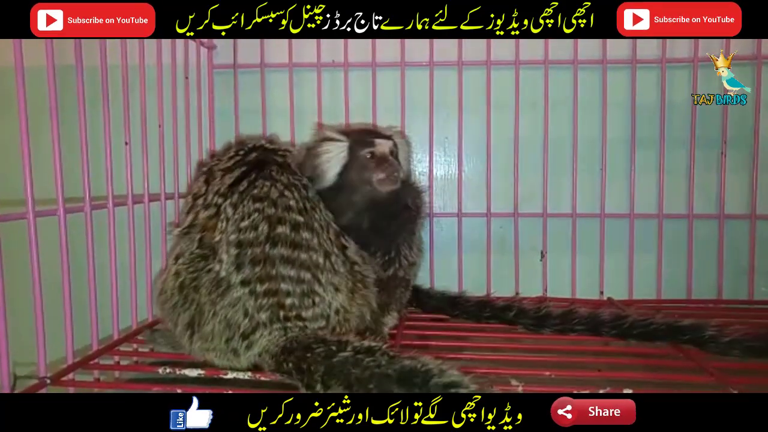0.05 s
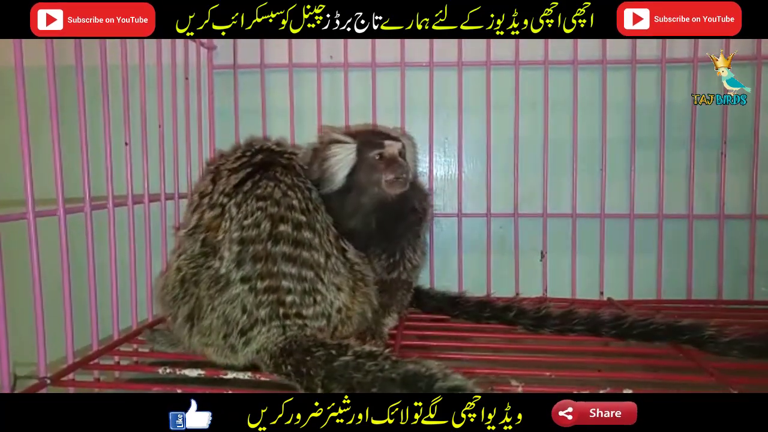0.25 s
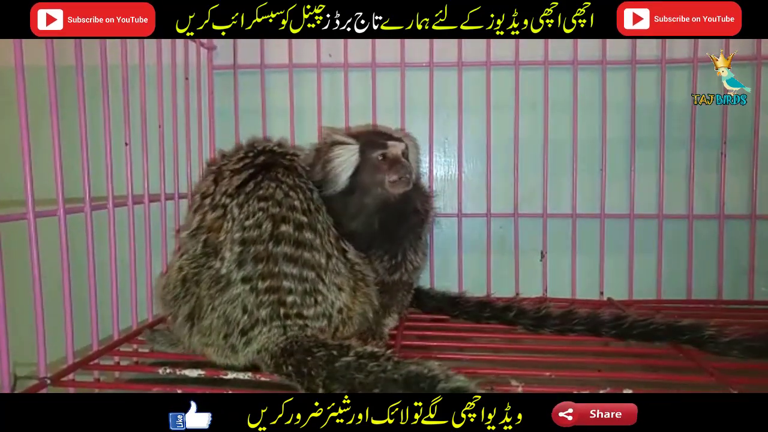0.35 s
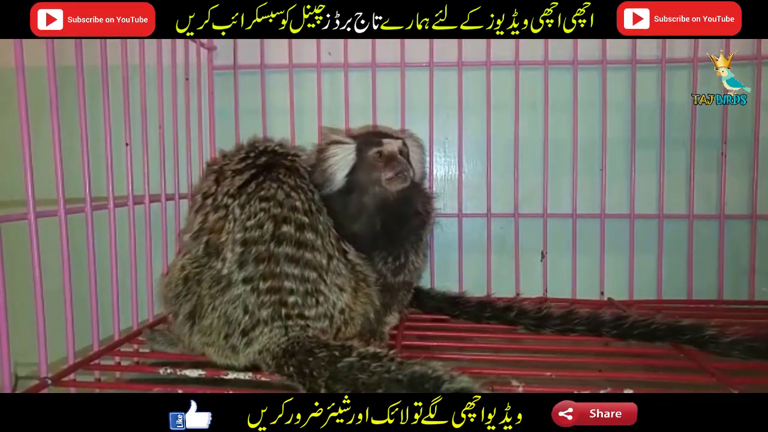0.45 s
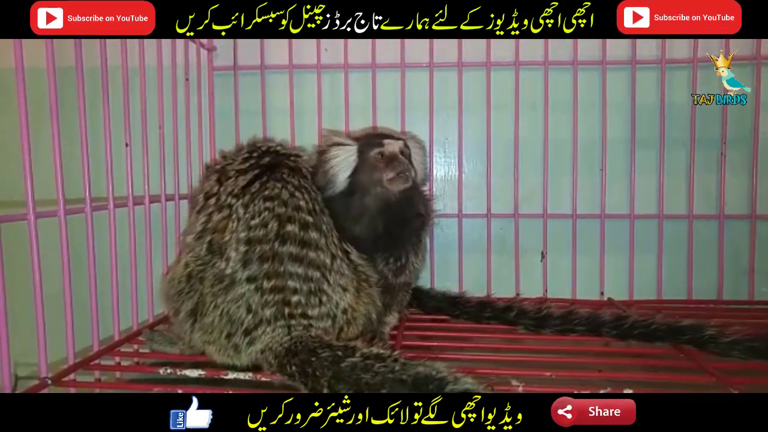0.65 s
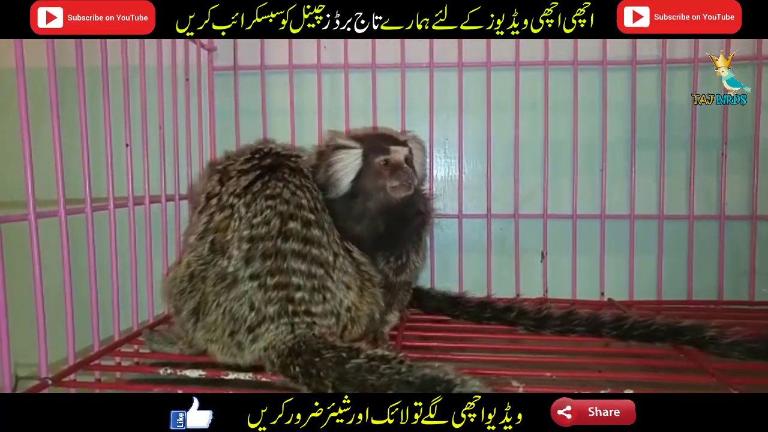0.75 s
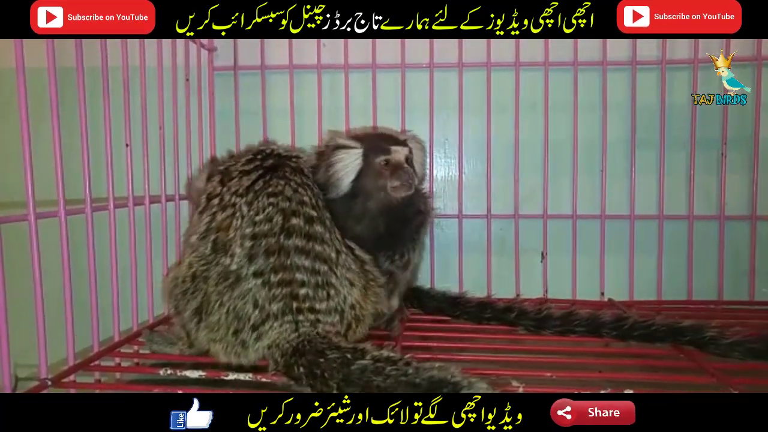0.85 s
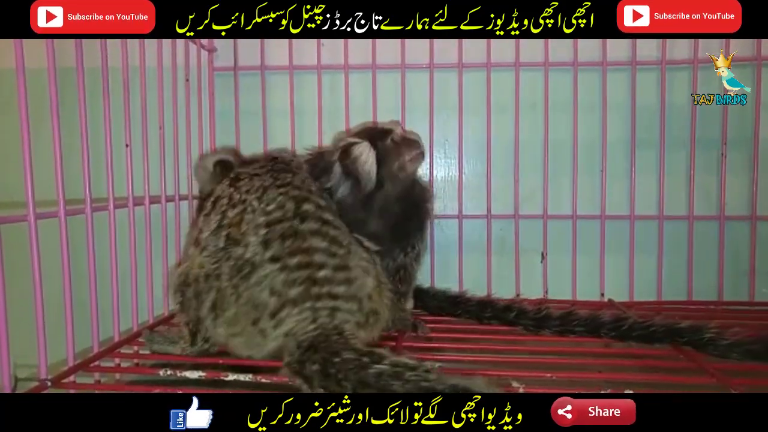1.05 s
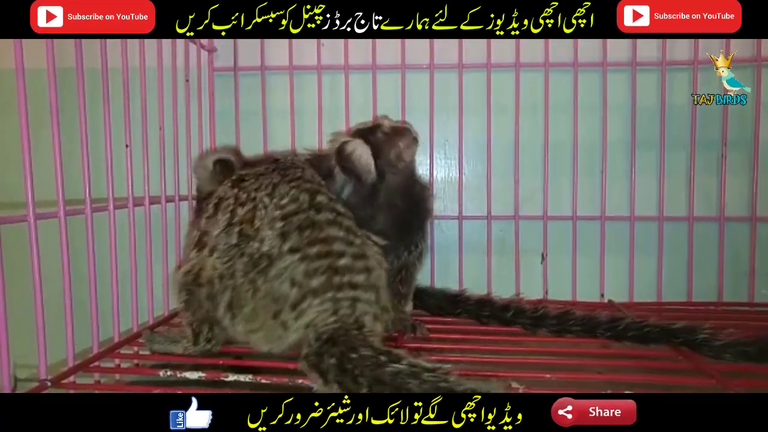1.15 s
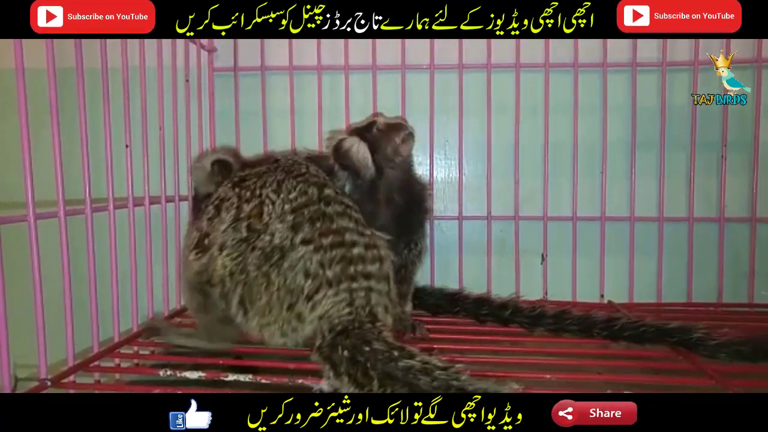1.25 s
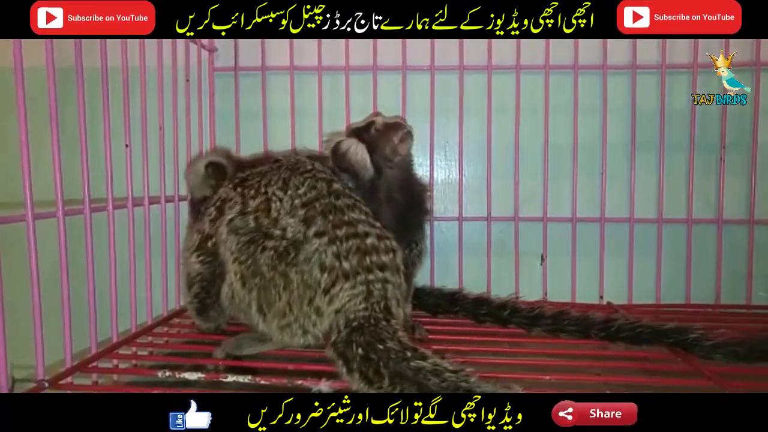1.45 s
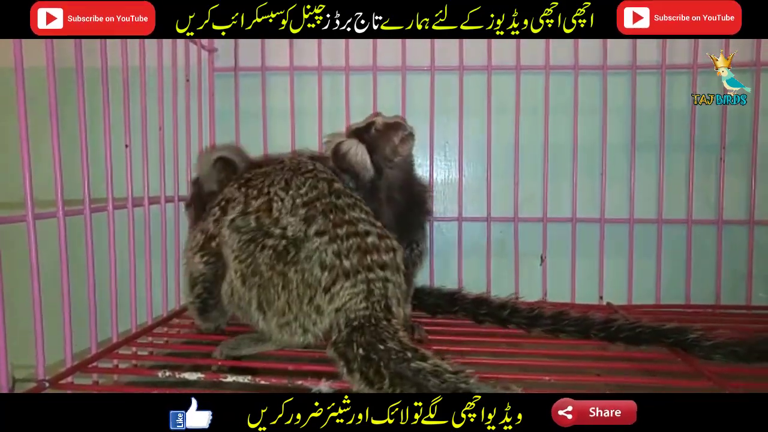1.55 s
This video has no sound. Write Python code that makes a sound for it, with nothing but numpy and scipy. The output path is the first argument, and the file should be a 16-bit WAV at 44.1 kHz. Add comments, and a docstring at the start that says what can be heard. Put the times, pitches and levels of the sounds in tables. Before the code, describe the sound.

Marmosets call close by in a hard-walled room: thin high squeaks, a light knock and rustle, a loud pure rising whistle, then a trill and overlapping rasping screeches over faint hum and shuffling.

```python
"""Marmosets calling in a wire cage

After thin whistles, a brief rustle and a knock, one gives a loud, pure rising whistle close by. Others answer
with trills and rasping, gliding screeches that ring in a hard-walled room. A bird peeps far off over mains hum,
fan tones, low room noise and shuffling. Voices are harmonics on moving pitches, the knocks are damped modes,
and the rustle, shuffling and room noise are coloured noise.
"""
import sys
import numpy as np
from scipy import signal
from scipy.fft import rfft, irfft
from scipy.io import wavfile

SR = 44100
rng = np.random.default_rng(int(sys.argv[2]) if len(sys.argv) > 2 else 0)


def to_wav(s):
    """Save 16-bit WAV."""
    ch = np.atleast_2d(s).T  # columns
    pcm = np.round(np.clip(ch, -1, 1) * 32767)  # PCM
    wavfile.write(sys.argv[1], SR, pcm.astype(np.int16))


N = 70560
TIME = np.arange(N) / SR


def from_db(db):
    """Decibels to gain."""
    return 10 ** (np.asarray(db) / 20)


def rms_one(x):
    """Scale to unit rms."""
    return x / np.sqrt(np.mean(x ** 2) + 1e-20)


def in_time(rows):
    """Columns of a curve, interpolated over time at every sample."""
    s, *columns = np.transpose(rows)
    return [np.interp(TIME, s, c) for c in columns]


def at_hz(points, hz):
    """Read a table on a log-frequency axis."""
    f, v = np.transpose(points)
    return np.interp(np.log(np.maximum(hz, 1)), np.log(f), v)


def drift(rate_hz):
    """Smooth random motion of rms 1, made by low-passing noise at rate_hz."""
    sos = signal.butter(2, min(rate_hz, SR / 4), fs=SR, output="sos")
    settled = signal.sosfilt(sos, rng.standard_normal(2 * N))[N:]
    return rms_one(settled)


def gate(start, length):
    """Switch a sound on and off with soft edges."""
    edge_s = 0.0017
    from_edge = np.minimum(TIME - start, start + length - TIME)
    return np.sin(np.pi / 2 * np.clip(from_edge / edge_s, 0, 1)) ** 2


def voice(hz, harmonics_db):
    """A tone on a moving pitch with its harmonics; a 0 dB harmonic has unit rms."""
    phase = 2 * np.pi * (np.cumsum(hz) / SR + rng.random())
    out = 0
    for k, db in enumerate(harmonics_db, 1):
        below_nyquist = k * hz < SR / 2
        out = out + from_db(db) * np.sin(k * phase) * below_nyquist
    return np.sqrt(2) * out


def noise(spectrum):
    """Coloured stereo noise of unit rms, most alike on both sides in the bass."""
    # left-right likeness: frequency_hz, likeness (0-1)
    likeness = [(60, 0.85), (160, 0.88), (350, 0.88), (700, 0.35), (2000, 0.1), (10000, 0.02)]
    hz = np.arange(N // 2 + 1) * SR / N
    alike = np.clip(at_hz(likeness, hz), 0, 1)
    mid, side = rfft(rng.standard_normal((2, N)))
    stereo = np.sqrt(1 + alike) * mid + np.sqrt(1 - alike) * side * [[1], [-1]]
    return rms_one(irfft(from_db(at_hz(spectrum, hz)) * stereo, N))


def pan(x, db):
    """Place a sound by the level difference between sides; positive is left."""
    return x * from_db(np.array([[1], [-1]]) * db / 2)


def delay(x, seconds):
    """The same sound, later, by turning its phase in proportion to frequency."""
    turn = np.exp(-1j * np.pi * np.arange(N + 1) * SR / N * seconds)
    return irfft(rfft(x, 2 * N) * turn, 2 * N)[:N]


def at_ports(x, lag_ms):
    """The left microphone port hears the sound a little later than the right."""
    return np.array([delay(x, lag_ms / 1000), x])


def in_room(x, room_db):
    """Direct sound plus a dense noise tail, different on each side, each band dying at its own rate."""
    # reverberation time: frequency_hz, t60_s
    room_t60 = [(500, 0.14), (1000, 0.56), (4000, 0.37), (8000, 0.41), (15000, 0.26)]
    first_echo_s = 0.0038
    t = TIME[:N // 2]
    edges = np.geomspace(400, 20000, 8)
    hz = np.arange(N // 2 + 1) * SR / N
    white = rfft(rng.standard_normal((2, N)))
    tail = 0
    for low, high in zip(edges, edges[1:]):
        band = irfft(white * (hz >= low) * (hz < high), N)[:, :len(t)]
        decay = np.exp(-np.log(1000) * t / at_hz(room_t60, np.sqrt(low * high)))
        tail = tail + band * decay * (t > first_echo_s)
    response = rms_one(tail) / np.sqrt(len(t))
    wet = signal.fftconvolve(x * np.ones((2, 1)), response, axes=1)[:, :N]
    return (x + from_db(room_db) * wet) / np.sqrt(1 + from_db(room_db) ** 2)


def hum():
    """Mains hum and fan tones, each wavering slightly in pitch and level."""
    # steady tones: pitch_hz, level_db
    tones = [(99.7, -57.5), (79, -68), (49, -70.5), (373.5, -71.5)]
    out = 0
    for hz, db in tones:
        out = out + voice(hz + .5 * drift(4.4), [db]) * from_db(0.35 * drift(2.38))
    return out


def room_noise():
    """Soft coloured noise whose level moves slowly."""
    # relative spectrum: frequency_hz, density_db (per Hz)
    spectrum = [(25, -22.5), (45, 0.5), (100, 4), (170, -7.5), (350, -3.5), (520, -12), (750, -5.5),
                (1500, -15.5), (3200, -17), (8000, -6), (10500, -18), (13000, -29.5)]
    # level curve: time_s, level_db
    level = [(0, -56), (.55, -52.5), (.9, -58), (1.2, -65.5), (1.38, -71.5), (1.6, -61.5)]
    db, = in_time(level)
    return from_db(db) * noise(spectrum)


def shuffling():
    """The animals shuffle on the cage floor: low coloured noise that swells and fades."""
    # relative spectrum: frequency_hz, density_db (per Hz)
    spectrum = [(25, -14.5), (60, 5.5), (130, -6), (280, -1.5), (500, -10.5), (800, -9.5), (1500, -17.5),
                (4000, -23), (9000, -58.5)]
    # level curve: time_s, level_db
    level = [(0, -79), (.68, -69), (.77, -53.5), (.95, -59.5), (1.07, -56.5), (1.2, -58.5), (1.55, -62.5),
             (1.6, -54)]
    db, = in_time(level)
    return from_db(db) * noise(spectrum)


def peeps():
    """A distant bird: short nasal notes, clear or hoarse, that scoop up to pitch, more room than direct."""
    # notes: start_s, length_s, pitch_hz, level_db, overtones_db, roughness (rms share of pitch)
    notes = [(.35, .05, 1400, -68, -20, .03), (.425, .05, 1350, -64, -20, .05),
             (0.46, 0.1, 2164, -66, -10, .006), (.73, .08, 2380, -64, -20, .035),
             (0.964, .12, 1860, -71, -29, .006), (1.13, 0.06, 1034, -54.5, -3.5, .002)]
    overtone_shape_db = [-1, .5, -8, -6]  # harmonics 2 to 5, added to overtones_db
    scoop_share, scoop_s = 0.045, 0.0077  # share of pitch a note starts low; time constant of the rise
    out = 0
    for s, length, hz, db, overtones_db, rough in notes:
        scoop = scoop_share * np.exp(-np.maximum(TIME - s, 0) / scoop_s)
        pitch = hz * (1 - scoop + rough * drift(190))
        harmonics_db = [0] + [overtones_db + d for d in overtone_shape_db]
        out = out + voice(pitch, harmonics_db) * from_db(db) * gate(s, length)
    return in_room(out, room_db=1)


def rustle():
    """A short, bright brush of noise, made grainy by fast random level changes."""
    # relative spectrum: frequency_hz, density_db (per Hz)
    spectrum = [(2000, -14), (3200, -26.5), (4300, -4), (6000, -4), (10000, 2.5), (14000, 0), (15500, 3),
                (17000, -14.5)]
    start_s, attack_s, hold_s, fall_db_per_s = 0.1738, 0.018, .014, 556
    t = TIME - start_s
    attack = np.clip(t / attack_s, 0, 1)
    fall = from_db(-fall_db_per_s * np.maximum(t - attack_s - hold_s, 0))
    grain = from_db(-40.5 + 5.1 * drift(400))
    return in_room(pan(noise(spectrum) * attack * fall * grain, db=2.5), room_db=-6)


def knock():
    """Light blows ring the cage's damped modes, alternating in sign."""
    # blows: time_s, level_db
    blows = [(.1775, -39), (.181, -98.5), (1.592, -55)]
    # what the cage rings with: pitch_hz, level_db (added to the blow's), t60_s
    modes = [(740, -7, 0.0342), (1060, -6.5, 0.049), (1308, -4.5, 0.042), (1580, -2.5, 0.011),
             (6900, 1.5, 0.017), (9200, 3, 0.0076), (13300, -8.5, 0.012)]
    out = 0
    for s, db in blows:
        t = np.maximum(TIME - s, 0)
        for k, (hz, mode_db, t60) in enumerate(modes):
            ring = np.sin(2 * np.pi * hz * t) * np.exp(-np.log(1000) * t / t60)
            out = out + (-1) ** k * from_db(db + mode_db) * ring
    return in_room(out, room_db=-10)


def thin_whistles():
    """Faint, short, nearly level notes: a fundamental and a weaker octave on a roughened pitch."""
    # notes: start_s, length_s, pitch_hz, glide_hz_per_s, level_db, octave_db (re fundamental)
    notes = [(0, 0.036, 7340, -500, -50, -9), (0.084, 0.023, 7570, -300, -56.5, -11),
             (0.133, 0.018, 7420, -900, -50, -8)]
    waver = .005  # rms share of pitch
    out = 0
    for s, length, hz, glide, db, octave_db in notes:
        pitch = (hz + glide * (TIME - s)) * (1 + waver * drift(199.7))
        out = out + voice(pitch, [0, octave_db]) * from_db(db) * gate(s, length)
    return in_room(pan(out, db=3.5), room_db=-5.5)


def trills():
    """The pitch swings about thirty times a second; the octave is stronger than the fundamental."""
    # calls: start_s, length_s, pitch_hz, glide_hz_per_s, swing_hz, level_db, octave_db (re fundamental),
    # swell_s, swell_db, fade_db_per_s, room_db
    calls = [(0.399, 0.165, 5020, -1200, 240, -37.5, 1.5, 0.026, 12, -75, -6),
             (1.522, .032, 6075, -0.5, 40, -45.5, 4, 0.0073, 28, -150, -8),
             (1.563, .05, 6170, 3, 45, -46.5, 3.5, 0.006, 12, -190, -5)]
    swing_rate_hz = 29.5
    rough, fray_per_s2 = .002, .22  # rms share of pitch; a long trill frays into a rasp
    out = 0
    for s, length, hz, glide, swing, db, octave_db, swell_s, swell_db, fade, room_db in calls:
        t = np.clip(TIME - s, 0, length)
        centre = hz + glide * t - swing * np.cos(2 * np.pi * swing_rate_hz * t)
        pitch = centre * (1 + (rough + fray_per_s2 * t ** 2) * drift(400))
        level = db - swell_db * np.maximum(1 - t / swell_s, 0) + fade * np.maximum(t - swell_s, 0)
        call = voice(pitch, [0, octave_db]) * from_db(level) * gate(s, length)
        out = out + in_room(pan(at_ports(call, lag_ms=0.2655), db=-4.5), room_db)
    return out


def screeches():
    """Gliding whistles broken into a rasp by uneven pitch swings, louder at the bottom of each swing."""
    # calls: octave_db (re fundamental), pan_db, curve of (time_s, pitch_hz, level_db, rasp_hz (rms swing))
    calls = [ (-17, -0.5, [(0, 6670, -35.5, 520), (.03, 6930, -67, 463), (.06, 6890, -51.5, 382)]),
             (-11.5, -1, [(.205, 5293, -53, 212), (.23, 5315, -44.5, 177), (.32, 5650, -47.5, 196),
             (.42, 5833, -46.5, 406), (.48, 5880, -48, 505), (.53, 6190, -55, 658), (.57, 6400, -46, 600)]),
             (-45, 0, [(.49, 6810, -40, 264), (.52, 6650, -60, 310), (.545, 7510, -43.5, 129),
             (.6, 7410, -81, 197)]), (-13, -1, [(.685, 4950, -48, 56.6), (.705, 5086, -49, 100),
             (.76, 5607, -50, 350), (.85, 6220, -56, 400), (.93, 6346, -50, 372), (1.0, 7080, -82, 348)]),
             (-29, -3, [(.713, 9430, -52, 117), (.735, 8750, -43, 440), (.737, 8730, -37.5, 426),
             (.8, 8770, -35, 463), (.86, 8306, -44, 607), (.93, 8140, -39.5, 522), (1.0, 8070, -41, 490),
             (1.045, 8290, -38.5, 170), (1.062, 8315, -30.5, 87), (1.085, 8126, -43, 60),
             (1.125, 8253, -48.5, 44.8), (1.14, 7900, -82, 79.6)]), (-9, -2, [(.855, 7380, -52, 154),
             (.875, 7550, -54, 203), (.95, 7410, -53, 201), (1.01, 7740, -81, 180),
             (1.05, 7700, -67, 172)])]
    rasp_rate_hz, uneven = 100, .35  # mean swing rate and its rms share of random change
    jitter, jitter_hz = .45, 230  # rms shake added to a swing of 1, and its bandwidth
    pulse_db, flutter_db = 3, 2  # level change per rms of pitch swing, and rms random level change
    out = 0
    for octave_db, pan_db, curve in calls:
        hz, db, rasp = in_time(curve)
        swing_rate = rasp_rate_hz * (1 + uneven * drift(60))
        swing = np.sin(2 * np.pi * np.cumsum(swing_rate) / SR)
        shake = rms_one(np.tanh(swing + jitter * drift(jitter_hz)))
        level = db - pulse_db * shake + flutter_db * drift(87)
        start, end = curve[0][0], curve[-1][0]
        cry = voice(hz + rasp * shake, [0, octave_db]) * from_db(level) * gate(start, end - start)
        out = out + pan(at_ports(cry, lag_ms=0.13), pan_db)
    return in_room(out, room_db=0.5)


def whistle():
    """A close pure tone swells, creeps upward and ends in an upward flick; the enclosure rings on."""
    # pitch and level curve: time_s, pitch_hz, level_db
    curve = [(0.178, 7400, -55), (0.185, 7780, -41), (0.209, 7940, -38), (.228, 7986, -27.5),
             (.25, 8080, -19.5), (0.274, 8123, -18.5), (0.321, 8160, -20.5), (0.328, 8290, -26),
             (0.335, 8720, -32), (.342, 8900, -65)]
    waver = .0004  # rms share of pitch
    start_pan_db, pan_db_per_s = 12.5, -101.5  # the head turns
    ring_hz, ring_width_hz, ring_db = 8130, 11, -3.5  # near the held pitch
    hz, db = in_time(curve)
    start, end = curve[0][0], curve[-1][0]
    tone = voice(hz * (1 + waver * drift(130)), [0]) * from_db(db) * gate(start, end - start)
    resonator = signal.iirpeak(ring_hz, ring_hz / ring_width_hz, fs=SR)
    ring = signal.lfilter(*resonator, tone) * from_db(ring_db)
    side_db = start_pan_db + pan_db_per_s * (np.clip(TIME, start, end) - start)
    direct = pan(at_ports(tone, lag_ms=0.14), side_db)
    return in_room(direct + pan(ring, db=-7), room_db=-20)


def scene():
    """All sources at the microphone."""
    background = hum() + room_noise() + shuffling() + peeps()
    cage = rustle() + knock()
    return background + cage + thin_whistles() + trills() + screeches() + whistle()


def record(dry):
    """The top is cut steeply, 70 dB down from 16.7 kHz."""
    return signal.sosfilt(signal.cheby2(16, 70, 16700, fs=SR, output="sos"), dry)


dry = scene()
out = record(dry)
to_wav(out)
```